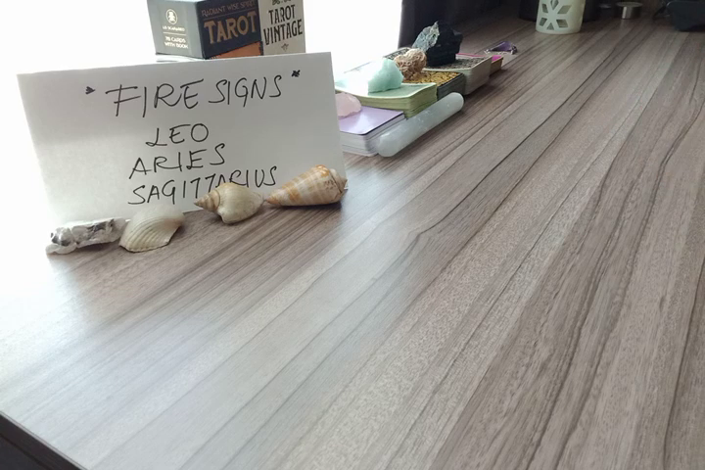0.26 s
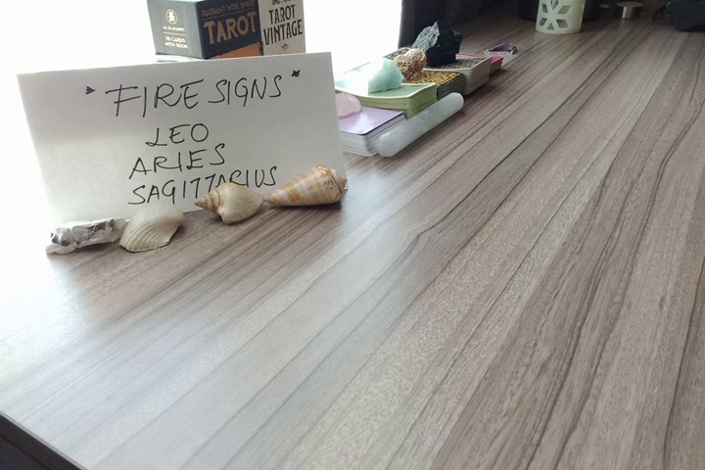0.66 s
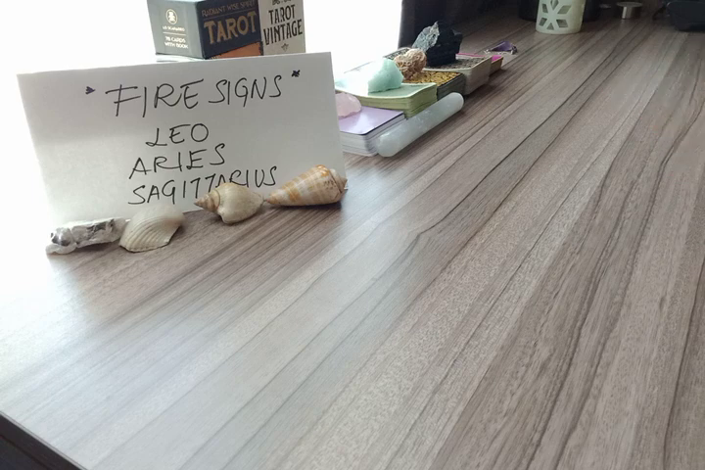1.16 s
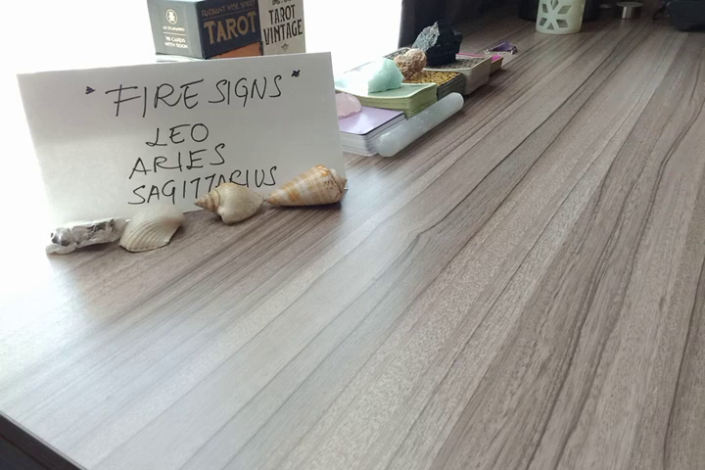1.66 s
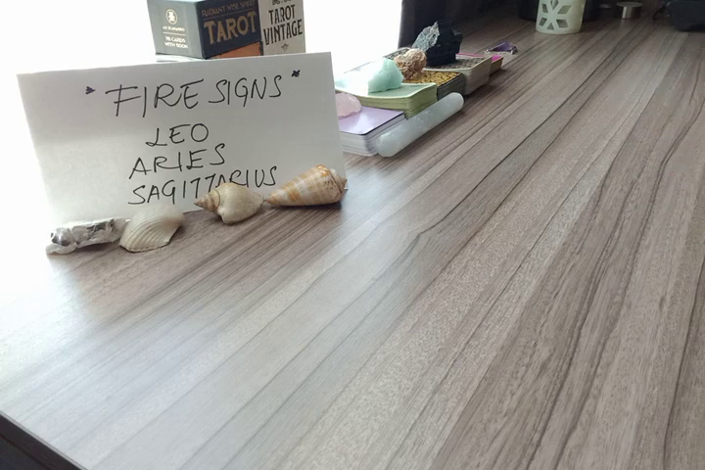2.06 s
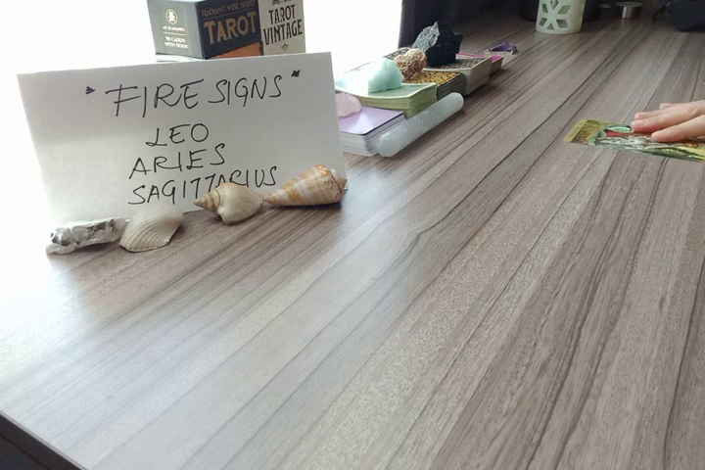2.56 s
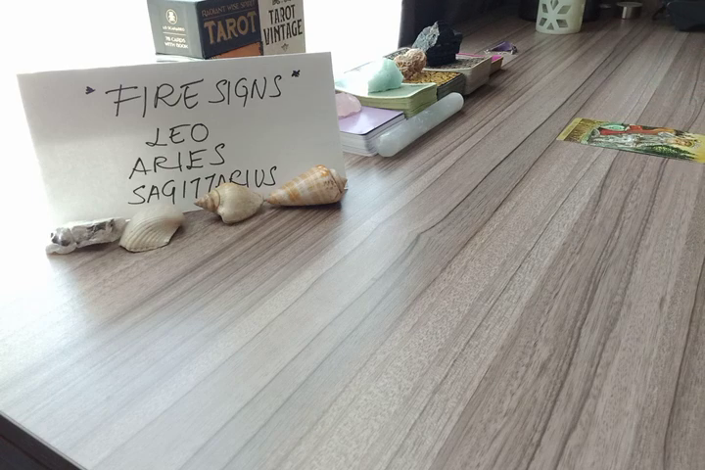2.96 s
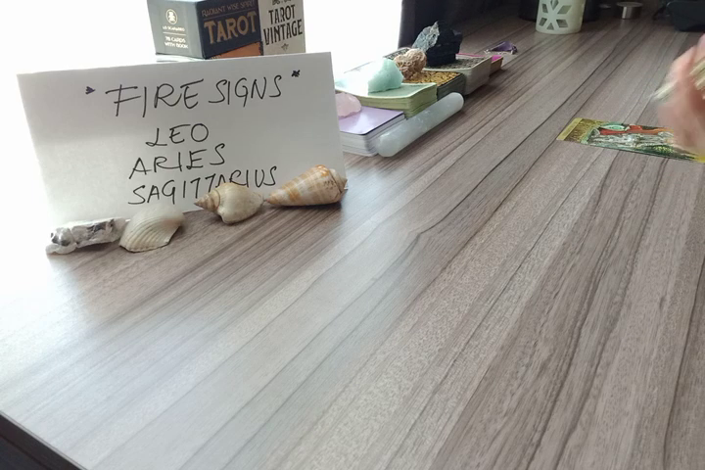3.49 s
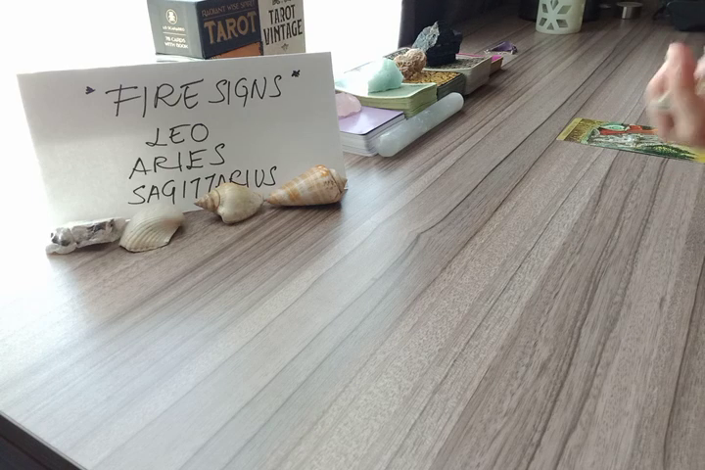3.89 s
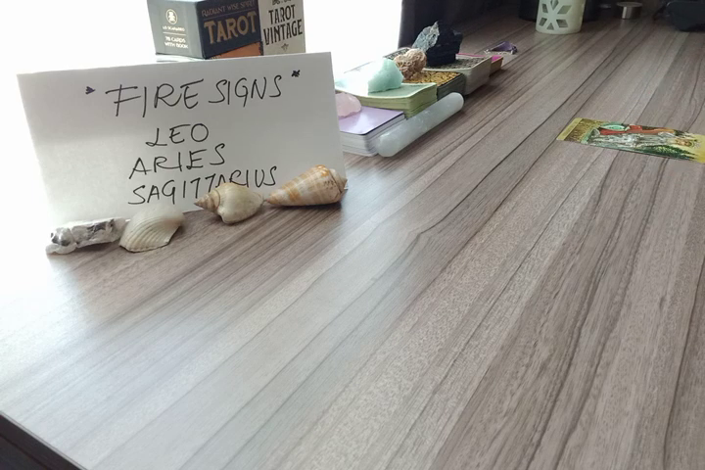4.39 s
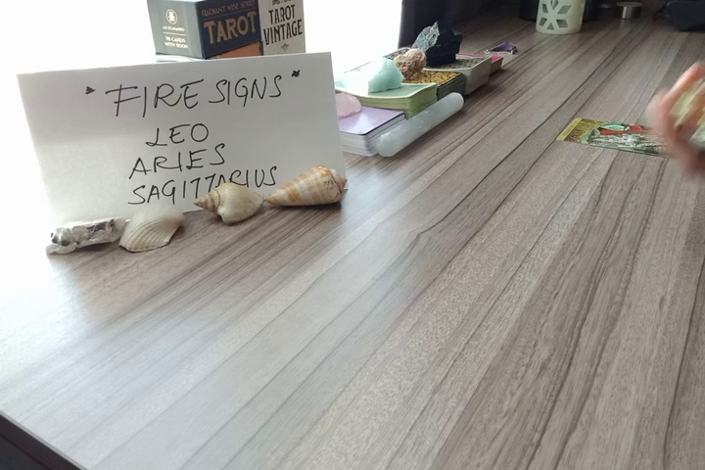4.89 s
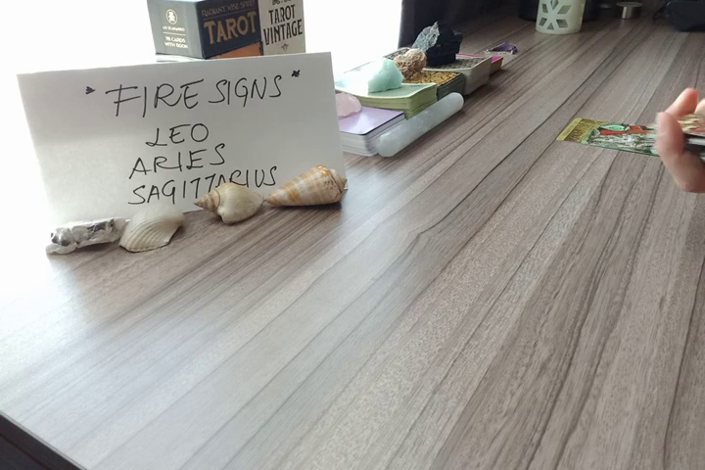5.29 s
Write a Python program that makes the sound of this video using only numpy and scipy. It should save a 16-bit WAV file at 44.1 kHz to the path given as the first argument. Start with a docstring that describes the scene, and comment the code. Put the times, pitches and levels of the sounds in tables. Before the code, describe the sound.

Nearly mono close pickup in a small quiet room: packets of cards hit the deck and palm with bright clicks and woody knocks, each followed by a tiny skid and soft rustle. Early blows are uneven, one card is slid and put down, handling nearly stops, then regular strong slaps return. Behind lie soft room air, a dim fluctuating motor hum and, late, a very faint two-note horn.

```python
"""Card shuffle over a desk

Tarot cards shuffled by hand in a small quiet room. Edges snap: noise bursts through damped modes.
Packets slap the palm: decaying tones sinking in pitch. Cards slide and scrape: grainy noise in strokes.
Behind: soft rustle of handling, motor drone (noise bands), room air (noise), a far two-note car horn (sines)."""
import sys
import numpy as np
from scipy import signal
from scipy.fft import rfft, irfft
from scipy.io import wavfile
from scipy.ndimage import uniform_filter1d

SR = 44100
rng = np.random.default_rng(int(sys.argv[2]) if len(sys.argv) > 2 else 0)


def to_wav(s):
    """Save 16-bit WAV."""
    ch = np.atleast_2d(s).T  # columns
    pcm = np.round(np.clip(ch, -1, 1) * 32767)  # PCM
    wavfile.write(sys.argv[1], SR, pcm.astype(np.int16))


N = 244314
TIME_S = np.arange(N) / SR
HIT_SIZE = 8192   # samples per blow

# packet lands on deck or card on desk: t/s, click/dB, tilt/(dB/octave), contact scatter/s,
# packet knock f/Hz, gain/dB, card flex f/Hz, gain/dB, card corner f/Hz, gain/dB,
# skid/dB (before tilt), ring/dB, rustle/dB (before overall handling gain)
LANDINGS = [(0.1802, -5.5, 1.8, 0.003, 1500, 12, 2560, 12, 9200, 4, -48, -57, -52.5),
            (0.3425, -16, 0.1, 0.0053, 1180, 6, 2540, 11, 10700, 6, -54, -74, -62),
            (0.7106, -12.5, 1.3, 0.0068, 500, 18, 1900, 13.5, 7830, -1, -54, -57.5, -53),
            (1.1394, -8, -3, 0.0026, 514, 12.5, 2670, 13.5, 10300, 9.5, -53, -71, -71),
            (2.174, -7.5, 0, 0.00062, 796, 12.5, 1930, 16.5, 8400, 9, -61, -79, -67),
            (2.3487, -16, 0.3, 0.016, 555, 10, 1400, 18, 3630, 10.5, -43, -60, -58.5),
            (2.4171, -15.5, -0.5, 0.002, 557, 13, 2940, 9, 3480, 4, -61, -72, -80),
            (3.7787, -12.5, 3, 0.00045, 830, 19.5, 1540, -6, 8800, -1, -49, -79, -54.5),
            (4.0291, -9.5, -1, 0.00047, 770, 5.5, 2400, 11, 5500, -2, -68, -61, -72),
            (4.1531, -15.5, 2.4, 0.0035, 630, 17, 1260, 15, 6340, 6.5, -51.5, -72, -68),
            (4.5009, -5.5, -2.1, 0.002, 576, 5, 2610, 15.5, 6770, 15, -41, -46.5, -48),
            (4.845, -8, -2.3, 0.01, 870, 6, 1750, 9.5, 10000, 12.5, -44, -53.5, -54),
            (5.1799, -5, -1.5, 0.0065, 830, 7.5, 1650, 10, 4700, 6.5, -44, -53.5, -52),
            (5.5335, -10, -1.5, 0.021, 440, 7, 1930, 4, 10500, 8, -50, -67, -67)]
# single card flicks off thumb or neighbour: t/s, click/dB, tilt/(dB/octave), contact scatter/s
FLICKS = [(0.3346, -13.5, -2, 0.0071), (0.5387, -27.5, -0.5, 0.0062), (0.74, -16.5, -2, 0.001),
          (0.8977, -20.5, -2, 0.0004), (1.1846, -16, -3, 0.00021), (1.3456, -27, -5, 0.0035),
          (1.3883, -31.5, -2.5, 0.0015), (2.335, -19.5, -1, 0.008), (2.3551, -17.5, -1.5, 0.0047),
          (3.2107, -33.5, -1, 0.00074), (4.357, -28, 0.2, 0.0082), (4.6835, -22, 2, 0.002),
          (4.775, -35.5, 1, 0.0017), (5.0364, -22, -0.5, 0.0014)]
# shared by all flicks: knock f/Hz, gain/dB, flex f/Hz, gain/dB, corner f/Hz, gain/dB
FLICK_MODES = (590, 4.6, 1900, 3.1, 7800, 2.8)
# edge click spectrum: f/Hz, level/dB
SNAP_COLOUR = [(100, -29), (400, -4), (900, -1.5), (1500, -4), (2500, 0.5), (5000, -0.5), (9000, -4),
               (12000, -13), (16000, -22)]
BEND_HZ, BEND_DB = 1190, 2   # whole deck bends with every blow
OVERTONE, OVERTONE_SHARE = 1.9, 0.35   # second flex mode: multiple of first, share of its dB
NEAR_ECHO_S = 0.000338   # nearby reflection
SMEAR_S = 0.0018   # first touch stands out less as contact scatter grows past this

# packet falls flat, squeezes out air:
# t/s, hollow of hand level/dB, nominal f/Hz, palm thump level/dB, nominal f/Hz
SLAPS = [(0.1921, -37.5, 1950, -60, 263), (0.344, -36, 1124, -48, 230), (0.7169, -38, 583, -64, 200),
         (1.141, -32, 1217, -39.5, 163), (1.142, -37.5, 490, -54, 160), (2.176, -37, 545, -48.5, 177),
         (2.352, -51, 500, -59, 200), (2.422, -43.5, 614, -57.5, 256), (3.783, -35.5, 403, -35, 200),
         (4.157, -40, 260, -50, 200), (4.5115, -32, 600, -42.5, 283), (4.854, -31.5, 424, -60, 248),
         (5.1898, -28, 561, -44.5, 272)]
# modes of the hollow: multiple of its f, level/dB relative to slap, t60/s
HOLLOW_MODES = [(1, -2, 0.024), (1.9, -1, 0.017)]
PALM_T60_S = 0.065

# card slides on card: t/s (fastest moment), level/dB before tilt, swell/s, tilt/(dB/octave)
SLIDES = [(0.015, -55.5, 0.039, -7.5), (0.142, -44.5, 0.009, 2.7), (0.218, -50, 0.022, 0),
          (0.472, -56, 0.016, 3), (0.507, -57, 0.005, 0.5), (0.581, -62.5, 0.044, -1),
          (0.875, -51.5, 0.019, 6), (1.126, -57, 0.011, -1), (1.17, -54, 0.025, -9.5),
          (1.33, -58, 0.018, 0.5), (1.42, -65.5, 0.023, -4), (1.734, -66, 0.0052, 2.5),
          (1.965, -63, 0.058, -7), (2.085, -53.5, 0.025, -4.5), (2.124, -42, 0.029, 1.5),
          (2.14, -43.5, 0.005, 6), (3.095, -55.5, 0.019, -1.5), (3.137, -53.5, 0.029, -0.5),
          (3.444, -65, 0.019, 1), (3.525, -61, 0.051, 3.5), (3.925, -60.5, 0.083, 3), (3.96, -43, 0.01, 3),
          (3.976, -41.5, 0.0045, -3), (4.229, -54, 0.012, 0), (4.274, -57.5, 0.027, 4),
          (4.299, -56, 0.0064, 2.5), (4.384, -61, 0.014, -3.5), (4.415, -59, 0.0043, -5),
          (4.706, -54.5, 0.017, -5), (4.948, -53.5, 0.0054, 3.5), (4.974, -49, 0.0092, 3.5),
          (5.018, -57, 0.014, -4.5), (5.061, -58.5, 0.0095, -6.5), (5.286, -50, 0.005, 2.5),
          (5.322, -50, 0.022, 2.5)]
# scraping edge, card sings in a narrow band: t/s (fastest moment), level/dB, swell/s, f/Hz
SCRAPES = [(0.153, -51.5, 0.0063, 790), (0.868, -58.5, 0.023, 3020), (2.052, -57, 0.0074, 2800),
           (2.105, -51, 0.034, 2700), (2.123, -36.5, 0.0036, 6760), (3.29, -69.5, 0.08, 7500),
           (3.275, -67, 0.11, 5500), (3.977, -42, 0.0024, 5630), (4.038, -48.5, 0.007, 2090),
           (4.39, -65, 0.038, 3220), (5.433, -57.5, 0.0062, 6150)]
# paper on paper, relative spectrum: f/Hz, level/(dB per Hz)
SLIDE_COLOUR = [(150, -29), (400, -7.5), (900, -12), (1500, -13.5), (2600, -6), (4500, -3.5), (8000, -4),
                (11000, -8), (14000, -16), (16000, -19)]
SCRAPE_Q = 4.4   # pitch over nominal width
FADE_S, FADE_SWELL_S, FADE_POWER = 0.01, 0.012, 0.62   # fade at this swell; slower strokes fade longer
SKID_DELAY_S = 0.012   # landing to peak of skid and ring
SKID_SWELL_S, SKID_FADE_S, SKID_TILT_DB_PER_OCTAVE = 0.0061, 0.013, -4.5
RING_SWELL_S, RING_FADE_S, RING_WIDTH_HZ = 0.006, 0.046, 260

# fingers shift on the deck, before overall handling gain: t/s, level/dB
HANDLING = [(0, -54), (0.45, -71), (0.66, -74), (0.9, -58.5), (1.05, -79), (1.27, -60.5), (1.6, -70.5),
            (2.05, -57), (2.45, -72), (2.6, -85), (3.0, -83), (3.2, -61.5), (3.4, -67.5), (3.7, -68.5),
            (3.9, -65.5), (4.1, -69), (5.15, -67), (5.54, -61.5)]
SETTLE_DELAY_S, SETTLE_SWELL_S, SETTLE_FADE_S = 0.053, 0.027, 0.065   # rustle after a landing

# horn partials, two notes: f/Hz
HORN_HZ = [501, 824, 1002, 1236, 1503, 2062, 2472]
# their rms before blow and waver: level/dB
HORN_DB = [-61, -70, -81, -75, -65.5, -78, -82]
# blow, as heard on the lowest partial: t/s, level/dB
HORN_LEVEL = [(5.03, -24), (5.07, -2), (5.10, -2), (5.16, 1), (5.24, -19), (5.33, -5)]

# motor drone bands: f/Hz, nominal width/Hz, rms level/dB before level curve
DRONE = [(58.1, 4.6, -65.5), (74.2, 7.4, -61), (95, 38, -69), (124.2, 7.4, -61), (142, 5.1, -65.5),
         (174.3, 11, -68.5)]
# drone level: t/s, level/dB
DRONE_LEVEL = [(0, 1), (0.7, 3.5), (1.1, -2), (1.45, 4.5), (1.75, -3), (2.1, 1), (5.54, -0.4)]
# room air, relative spectrum before low cuts: f/Hz, level/(dB per Hz)
AIR = [(100, 8), (180, -1), (280, 0.5), (380, -7.5), (500, -6), (700, -14.5), (1000, -15.5), (1350, -21),
       (1700, -31), (2200, -37), (3200, -36), (4500, -30.5), (7000, -30.5), (15000, -32.5)]
AIR_DB = -61.5   # rms

# reverberation time: f/Hz, t60/s
ROOM_T60 = [(150, 0.18), (600, 0.43), (2000, 0.3), (6000, 0.324), (15000, 0.32)]
# reverberation spectrum: f/Hz, level/dB
ROOM_COLOUR = [(120, -2.5), (500, -14.5), (1200, -9.5), (2300, -8.5), (4500, -16.5), (9000, -16.5),
               (15000, -11.5)]
CUTOFF_HZ = 15900


def snaps(packet_q=7.8, flex_q=9.8, corner_q=8.4, reflection=0.2, sharp=0.65, spread=0.59,
          flutter_db=-3.5, flutter_s=0.007, ring_share=0.34):
    """Edges touch within ms, packet knocks, card flexes, loose cards flutter; returns (near, into room)."""
    near, around = np.zeros(N), np.zeros(N)
    hz, t = bins(HIT_SIZE), np.arange(HIT_SIZE) / SR
    fade = np.cos(np.pi / 2 * t / t[-1]) ** 2
    echo = 1 + reflection * np.exp(-2j * np.pi * hz * NEAR_ECHO_S)
    blows = list(LANDINGS) + [(*flick, *FLICK_MODES) for flick in FLICKS]
    for blow in blows:
        s, db, tilt_db, scatter_s = blow[:4]
        packet_hz, packet_db, flex_hz, flex_db, corner_hz, corner_db = blow[4:10]

        touches = rng.standard_normal(HIT_SIZE) * np.exp(-t / (spread * scatter_s))
        first_touch = sharp * np.exp(-scatter_s / SMEAR_S) * (t == 0)
        contact = rfft(touches / np.linalg.norm(touches) + first_touch)
        # scatter smears the click but keeps its colour
        contact /= causal(np.sqrt(uniform_filter1d(np.abs(contact) ** 2, size=41)))

        flutter = friction(HIT_SIZE, grain_db=1.0, grain_s=0.00041) * np.exp(-t / flutter_s)
        flutter = from_db(flutter_db) * rfft(flutter / np.linalg.norm(flutter))

        tilt = tilted(hz, tilt_db, pivot_hz=2920, lowest_hz=500)
        colour = causal(from_db(db + at_hz(SNAP_COLOUR, hz)) * tilt)

        modes = [(packet_hz, packet_db, packet_q),
                 (BEND_HZ, BEND_DB, packet_q),
                 (flex_hz, flex_db, flex_q),
                 (OVERTONE * flex_hz, OVERTONE_SHARE * flex_db, flex_q),
                 (corner_hz, corner_db, corner_q)]
        ring = 1
        for mode_hz, mode_db, q in modes:
            ring = ring * (1 + (from_db(mode_db) - 1) * resonance(hz, mode_hz, q))
        # over many cards and directions the peaks even out
        blurred = causal(np.abs(ring) ** ring_share)

        add(near, s, fade * irfft(colour * (contact * ring * echo + flutter * blurred)))
        add(around, s, fade * irfft(colour * contact * blurred))
    return near, around


def slaps(crackle_db=-7.5, crackle_s=0.0021, sag=0.27):
    """Hollow between hand and cards rings briefly, sinks in pitch as it closes; palm thumps below."""
    out, t = np.zeros(N), np.arange(HIT_SIZE) / SR
    for s, slap_db, hollow_hz, palm_db, palm_hz in SLAPS:
        modes = [(hollow_hz * multiple, slap_db + db, t60_s) for multiple, db, t60_s in HOLLOW_MODES]
        modes.append((palm_hz, palm_db, PALM_T60_S))
        for mode_hz, db, t60_s in modes:
            # starts above nominal pitch, ends below
            pitch_hz = mode_hz * (1 + sag * (2 * np.exp(-t / t60_s * 2) - np.sqrt(2)))
            thud = np.sin(2 * np.pi * np.cumsum(pitch_hz) / SR) * from_db(-60 * t / t60_s)
            crackle = coloured(rng.standard_normal(HIT_SIZE), 1 / (1 + bins(HIT_SIZE) / 2500))
            crackle = crackle * np.exp(-t / crackle_s)
            add(out, s, from_db(db) * (thud + from_db(crackle_db) * crackle))
    return out


def slides():
    """Stroke hisses as it gathers speed, fades as the card stops; a scraping edge excites one mode."""
    out, size = np.zeros(N), 4 * HIT_SIZE
    hz, t = bins(size), (np.arange(size) - size / 2) / SR
    colour = from_db(at_hz(SLIDE_COLOUR, hz))
    hisses, songs = strokes()
    for s, db, swell_s, fade_s, tilt_db in hisses:
        hiss = coloured(friction(size, grain_db=2.5, grain_s=0.00061), colour)
        hiss = irfft(rfft(hiss) * tilted(hz, tilt_db, pivot_hz=4600, lowest_hz=1400))
        add(out, s + t[0], from_db(db) * stroke(t, swell_s, fade_s) * hiss)
    for s, db, swell_s, fade_s, mode_hz, width_hz in songs:
        mode = resonance(hz, mode_hz, mode_hz / width_hz / np.sqrt(2)) ** 2
        song = coloured(friction(size, grain_db=2.5, grain_s=0.0029), mode)
        add(out, s + t[0], from_db(db) * stroke(t, swell_s, fade_s) * song)
    return out


def strokes():
    """All rubbing: slides, scrapes, skid and ring after each landing.
    Hisses: t/s, level/dB, swell/s, fade/s, tilt/(dB/octave). Songs: same, with f/Hz, width/Hz for tilt."""
    hisses = [(s, db, swell_s, fade_of(swell_s), tilt_db) for s, db, swell_s, tilt_db in SLIDES]
    songs = [(s, db, swell_s, fade_of(swell_s), hz, hz / SCRAPE_Q) for s, db, swell_s, hz in SCRAPES]
    for landing in LANDINGS:
        peak_s, flex_hz = landing[0] + SKID_DELAY_S, landing[6]
        skid_db, ring_db = landing[10:12]
        hisses.append((peak_s, skid_db, SKID_SWELL_S, SKID_FADE_S, SKID_TILT_DB_PER_OCTAVE))
        songs.append((peak_s, ring_db, RING_SWELL_S, RING_FADE_S, flex_hz, RING_WIDTH_HZ))
    return hisses, songs


def stroke(t, swell_s, fade_s, fade_shape=1.12):
    """Speed of a card around its fastest moment, 1 at the peak."""
    return np.exp(-np.where(t < 0, (t / swell_s) ** 2, np.abs(t / fade_s) ** fade_shape))


def fade_of(swell_s):
    """Stopping time of a stroke from its swell time."""
    return FADE_S * (swell_s / FADE_SWELL_S) ** FADE_POWER


def friction(size, grain_db, grain_s):
    """Paper fibres catch and let go: noise whose strength varies from grain to grain."""
    grains = rms_one(uniform_filter1d(rng.standard_normal(size), max(1, round(grain_s * SR))))
    return rng.standard_normal(size) * from_db(grain_db * grains)


def handling(level_db=-8.0):
    """Soft rustle of the deck between strokes; swells as cards settle after each landing."""
    tilt = tilted(bins(N), tilt_db=-2.5, pivot_hz=5000, lowest_hz=1500)
    colour = from_db(at_hz(SLIDE_COLOUR, bins(N))) * tilt
    motion, t = from_db(in_time(HANDLING)), np.arange(SR) / SR
    for s, *_, rustle_db in LANDINGS:
        settling = stroke(t - SETTLE_DELAY_S, SETTLE_SWELL_S, SETTLE_FADE_S)
        add(motion, s, from_db(rustle_db) * settling)
    rustle = coloured(friction(N, grain_db=3.0, grain_s=0.013), colour)
    return from_db(level_db) * motion * rustle


def room(x, first_wall_s=0.0095, build_s=0.0015):
    """Diffuse reflections: noise tail in overlapping octave bands, each with its own decay."""
    size = 4 * HIT_SIZE
    t, hz, tail = np.arange(size) / SR, bins(size), 0
    white = rfft(rng.standard_normal(size))
    onset = 1 - np.exp(-np.maximum(t - first_wall_s, 0) / build_s)
    for centre_hz in 125 * 2 ** np.arange(8):
        octave = np.maximum(0, 1 - np.abs(np.log2((hz + 1) / centre_hz)))
        decay = onset * np.exp(-np.log(1000) * t / at_hz(ROOM_T60, centre_hz))
        band_gain = from_db(at_hz(ROOM_COLOUR, centre_hz))
        tail = tail + irfft(white * octave) * decay / np.linalg.norm(decay) * band_gain
    return signal.fftconvolve(x, tail)[:N]


def horn(brassiness=0.7, waver_db=4.5):
    """Short two-note toot from the street: overtones speak last, the path makes each partial waver."""
    out, blow_db = np.zeros(N), in_time(HORN_LEVEL)
    for hz, db in zip(HORN_HZ, HORN_DB):
        waver = coloured(rng.standard_normal(N), np.exp(-bins(N) / 15))
        partial_blow_db = blow_db * (hz / HORN_HZ[0]) ** brassiness
        gain = from_db(db + partial_blow_db + waver_db * waver)
        out += gain * np.sqrt(2) * np.sin(2 * np.pi * (hz * TIME_S + rng.random()))
    return out * (TIME_S > HORN_LEVEL[0][0]) * (TIME_S < HORN_LEVEL[-1][0])


def motor():
    """Low drone: narrow noise bands sharing one level curve."""
    hz, out = bins(N), np.zeros(N)
    for centre_hz, width_hz, db in DRONE:
        band = rumble_cut(hz) / (1 + ((hz - centre_hz) / width_hz * np.sqrt(2)) ** 2)
        out += from_db(db + in_time(DRONE_LEVEL)) * coloured(rng.standard_normal(N), band)
    return out


def air(bass_edge_hz=140):
    """Quiet of the room: steady shaped noise."""
    hz = bins(N)
    bass_cut = hz ** 2 / (hz ** 2 + bass_edge_hz ** 2)
    colour = rumble_cut(hz) * from_db(at_hz(AIR, hz)) * bass_cut
    return from_db(AIR_DB) * coloured(rng.standard_normal(N), colour)


def rumble_cut(hz, edge_hz=50):
    """Steep low cut of the background."""
    return 1 / np.sqrt(1 + (edge_hz / (hz + 1)) ** 10)


def from_db(db):
    """Decibels to gain."""
    return 10 ** (np.asarray(db) / 20)


def rms_one(x):
    """Scale to unit rms."""
    return x / np.sqrt(np.mean(x ** 2) + 1e-20)


def in_time(rows):
    """Join (t/s, value) rows by straight lines."""
    return np.interp(TIME_S, *np.transpose(rows))


def at_hz(points, hz):
    """Read (f/Hz, value) points on a log-frequency axis."""
    knots, values = np.transpose(points)
    return np.interp(np.log(np.maximum(hz, 1)), np.log(knots), values)


def bins(size):
    """Spectrum frequencies in Hz for that many samples."""
    return np.fft.rfftfreq(size, 1 / SR)


def tilted(hz, tilt_db, pivot_hz, lowest_hz):
    """Gain of a slope in dB per octave, flat below lowest_hz."""
    return from_db(tilt_db * np.log2(np.maximum(hz, lowest_hz) / pivot_hz))


def causal(gain):
    """Minimum-phase response of a gain curve: nothing sounds before the blow."""
    cepstrum = irfft(np.log(gain + 1e-9))
    half = len(cepstrum) // 2
    folded = np.r_[cepstrum[0], 2 * cepstrum[1:half], cepstrum[half]]
    return np.exp(rfft(folded, len(cepstrum)))


def resonance(hz, centre_hz, q):
    """Response of one damped mode, 1 at its peak."""
    damping = 1j * hz * centre_hz / q
    return damping / (centre_hz ** 2 - hz ** 2 + damping)


def coloured(x, gain):
    """Shape a noise spectrum; rms 1."""
    return rms_one(irfft(rfft(x) * gain, len(x)))


def add(out, start_s, sound):
    """Mix a sound in at its time, cut at the ends."""
    at = round(start_s * SR)
    first, last = max(at, 0), min(at + len(sound), N)
    if last > first:
        out[first:last] += sound[first - at:last - at]


def scene(snap_room_db=2.0, side_db=-64.0, side_noise_db=-93.0):
    """Cards close to the microphone; nearly mono; a very faint side signal is added."""
    edges, edges_around = snaps()
    thuds, rustle = slaps(), slides() + handling()
    into_room = from_db(snap_room_db) * edges_around + thuds + rustle
    mid = edges + thuds + rustle + room(into_room) + horn() + motor() + air()
    side = from_db(side_db) * room(into_room) + from_db(side_noise_db) * rng.standard_normal(N)
    return np.array([mid + side, mid - side])


def record(dry):
    """Microphone drops the deepest bass; top cut steeply."""
    thin = signal.sosfilt(signal.butter(4, 42, "high", fs=SR, output="sos"), dry)
    return signal.sosfilt(signal.ellip(10, .2, 70, CUTOFF_HZ, fs=SR, output="sos"), thin)


dry = scene()
out = record(dry)
to_wav(out)
```